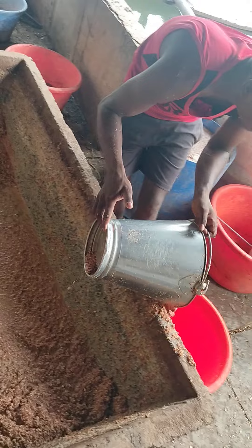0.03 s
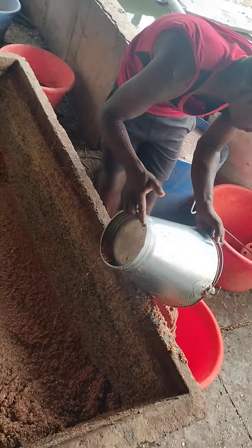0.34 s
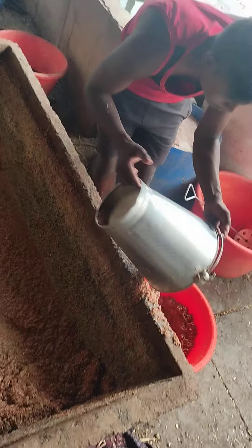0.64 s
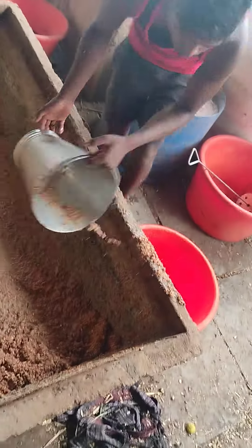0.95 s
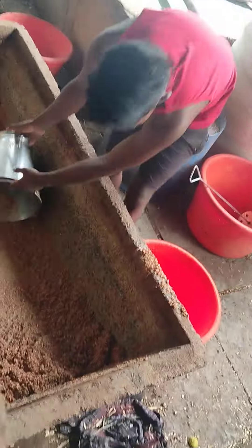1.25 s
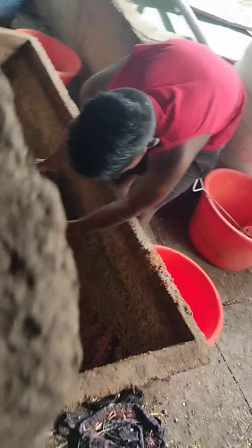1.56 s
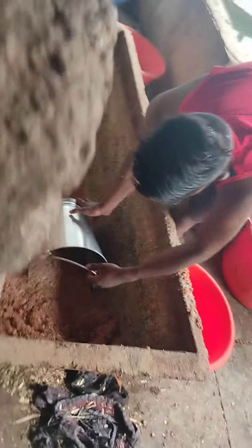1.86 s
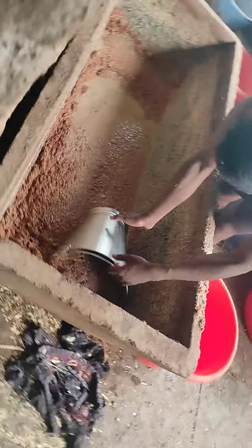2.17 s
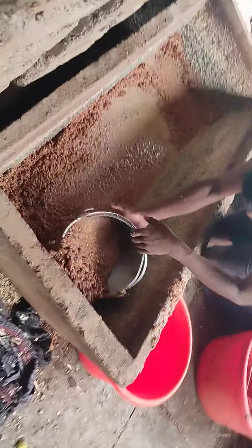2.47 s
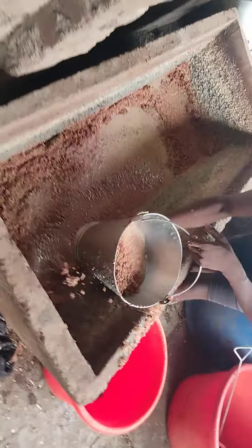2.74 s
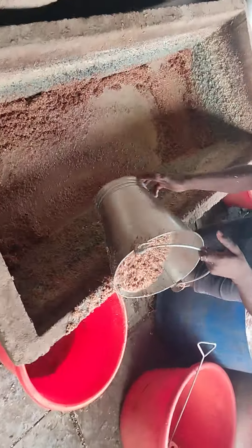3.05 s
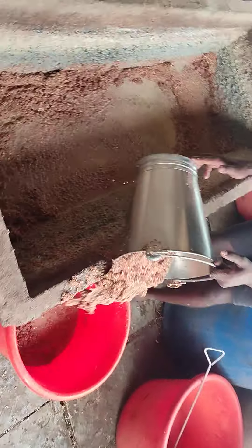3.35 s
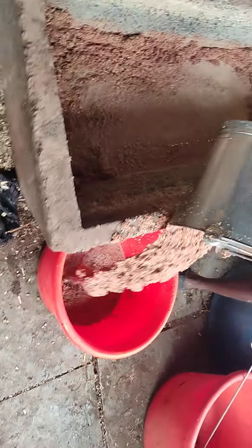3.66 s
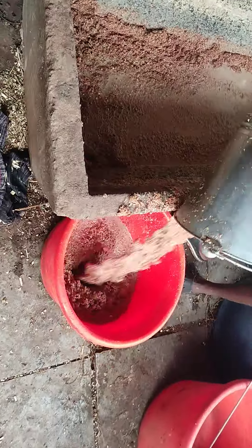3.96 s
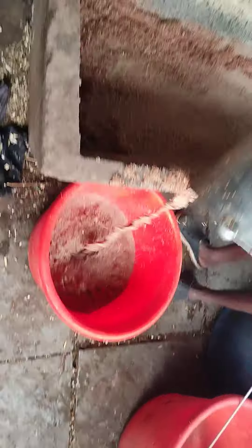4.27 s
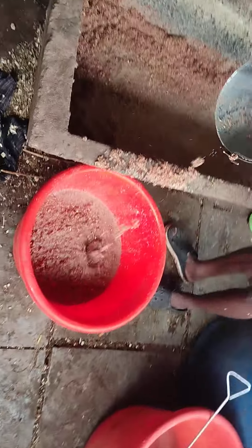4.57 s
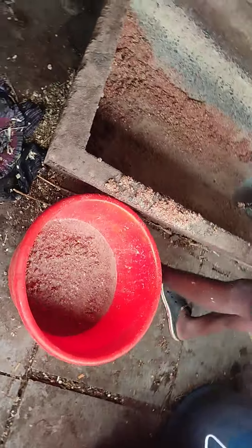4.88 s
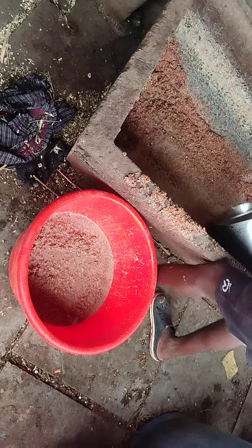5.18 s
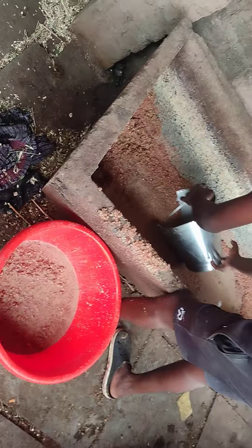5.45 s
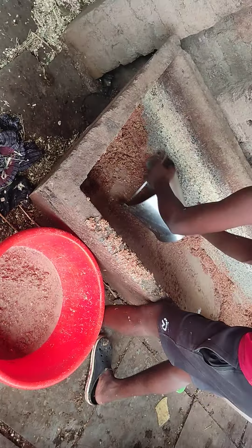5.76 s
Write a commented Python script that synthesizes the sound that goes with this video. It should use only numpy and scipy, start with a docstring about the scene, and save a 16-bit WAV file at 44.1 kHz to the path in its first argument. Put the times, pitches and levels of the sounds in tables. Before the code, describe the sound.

Damp, grainy feed pours twice from a metal bucket into a plastic tub, with the bucket scraping and knocking through a concrete trough after each pour.

```python
"""Damp, grainy feed pours twice from a metal bucket into a plastic tub: crumbs patter, wet lumps slap down
and the tub booms. After each pour the bucket is dragged through a concrete trough: its rim grinds on grit,
its walls and hollow ring, and it knocks dully. In between, its handle clinks and feet shuffle.
All this is close by in a quiet yard, with puffs of wind on the two microphones."""
import sys
import numpy as np
from scipy import signal
from scipy.fft import rfft, irfft, next_fast_len
from scipy.io import wavfile
from scipy.ndimage import uniform_filter1d, map_coordinates

SR = 44100
rng = np.random.default_rng(int(sys.argv[2]) if len(sys.argv) > 2 else 0)


def digitize_waveform(pressure):
    """Quantize a signal to 16-bit integers and store it at the path in sys.argv[1].

    Rows of a 2-D input are taken as channels; values are limited to [-1, 1].
    """
    field = np.atleast_2d(pressure).T
    bounded = np.clip(field, -1, 1)
    quanta = np.round(bounded * 32767).astype(np.int16)
    wavfile.write(sys.argv[1], SR, quanta)


N = 256662
TIME_S = np.arange(N) / SR
SIDES = np.array([[.5], [-.5]])  # half goes to the left, the opposite half to the right


def amp(db):
    """Turn decibels into a gain."""
    return 10 ** (np.asarray(db) / 20)


def unit(x):
    """Scale a sound to an average (rms) level of 1."""
    return x / np.sqrt(np.mean(x ** 2) + 1e-20)


def along(points, hz):
    """Read between (pitch_hz, value) points, spacing the octaves evenly."""
    pitches, values = np.transpose(points)
    return np.interp(np.log(hz + 1), np.log(pitches + 1), values)


def curves(rows):
    """Join timed rows with straight lines: one curve for each column after the time."""
    times, *columns = np.transpose(rows)
    return [np.interp(TIME_S, times, column) for column in columns]


def wobble(rate):
    """A smooth random curve that heads for a new value rate times a second."""
    return map_coordinates(rng.standard_normal(int(N * rate / SR) + 4), [TIME_S * rate])


def swell(time_s, half_s):
    """A smooth rise and fall around one moment."""
    return np.exp(-((TIME_S - time_s) / half_s) ** 2)


def held(start_s, end_s, rise_s, fall_s):
    """Rise, hold until the end, then fade away."""
    return np.clip((TIME_S - start_s) / rise_s, 0, 1) * np.exp(-np.maximum(TIME_S - end_s, 0) / fall_s)


def burst(start_s, fade_s, rise_s):
    """The loudness of one hit: a quick rise, and a fall of 60 dB in fade_s."""
    out, start = np.zeros(N + SR), round(start_s * SR)
    t = np.arange(SR // 3) / SR
    out[start:start + len(t)] = (1 - np.exp(-t / rise_s)) * amp(-60 * t / fade_s)
    return out[:N]


def filtered(x, response):
    """Turn each pitch in a sound up or down by response(hz)."""
    size = next_fast_len(N + SR // 4, True)
    return irfft(rfft(x, size) * response(np.fft.rfftfreq(size, 1 / SR)), size)[..., :N]


def colour(x, tone):
    """Shape a sound's bass, middle and treble with a tone table."""
    return unit(filtered(x, lambda hz: amp(along(tone, hz))))


def ring(x, notes):
    """Let a sound shake an object that rings at its own steady notes."""
    def response(hz):
        return sum(amp(db) * 1j * hz * width / (pitch ** 2 - hz ** 2 + 1j * hz * width)
                   for pitch, width, db in notes)
    return unit(filtered(x, response))


def glide(x, hz, width_hz, evenness):
    """Ring at one note, which may slide; evenness from 0 to 1 smooths out its loudness."""
    turn = np.exp(2j * np.pi * np.cumsum(hz * np.ones(x.shape[-1])) / SR)
    band = x / turn  # move the note down to 0 Hz, smooth it, then move it back
    for width in (width_hz, 2 * width_hz):
        band = signal.lfilter([1], [1, -np.exp(-np.pi * width / SR)], band)
    return unit((band * turn).real / (np.abs(band) + 1e-9) ** evenness)


def grains(rate, spread_db=0):
    """Tiny random clicks, about rate a second on each side; spread_db makes their sizes uneven."""
    size = amp(spread_db * np.clip(rng.standard_normal((2, N)), -2, 2))
    hits = rng.random((2, N)) < rate / SR
    return unit(hits * size * np.sign(rng.standard_normal((2, N))))


def patchy(x, depth_db):
    """Each passing clod has its own tone: random patches of time and pitch get louder or softer."""
    spectrum = signal.stft(x, nperseg=512)[2]
    patches = uniform_filter1d(rng.standard_normal(spectrum.shape[1:]), size=5, axis=0)
    patches = unit(uniform_filter1d(patches, size=4, axis=1))
    return unit(signal.istft(spectrum * amp(depth_db * patches), nperseg=512)[1][:, :N])


def wall_echo(x, fade_s, echo_db):
    """The trough and nearby walls add a short, blurred echo."""
    t = np.arange(SR // 3) / SR
    tail = rng.standard_normal((2, len(t))) * amp(-60 * t / fade_s) * (t > .002)
    tail /= np.linalg.norm(tail[0])
    return x + amp(echo_db) * signal.fftconvolve(x, tail, axes=1)[:, :N]


# how alike left and right sound: pitch_hz, likeness_0_to_1
LIKENESS = [(60, .1), (130, 1), (250, 1), (500, 0.9), (1000, 0.52), (2000, 0.033), (5000, 0.026),
            (12000, .02)]
def two_microphones(x):
    """Long, low waves reach both microphones alike; short, high ones do not."""
    blend = lambda hz: np.arcsin(np.clip(along(LIKENESS, hz), 0, 1)) / 2
    return filtered(x, lambda hz: np.cos(blend(hz))) + filtered(x[::-1], lambda hz: np.sin(blend(hz)))


# tone of the quiet yard: pitch_hz, level_db
YARD_TONE = [(59, -41), (100, -4), (258, -3.5), (627, -6.5), (2520, -11.5), (9150, -23.5), (12000, -30),
             (15500, -25)]
def yard():
    """A faint, steady outdoor hush."""
    return amp(-49.5) * colour(rng.standard_normal((2, N)), YARD_TONE)


# strength of the wind: time_s, level_db
GUSTS = [(0.07, -47.5), (0.22, -25.5), (0.47, -18.5), (0.78, -34), (1.07, -23), (1.55, -22), (1.97, -26),
         (2.3, -20), (2.55, -34), (2.8, -25), (3.15, -37.5), (3.48, -29), (4.0, -44.5), (4.6, -35.5),
         (4.85, -40.5), (5.22, -38.5), (5.35, -23), (5.82, -45)]
# which side the wind hits harder: time_s, left_over_right_db
GUST_SIDE = [(1.0, 5), (2.8, -2.5), (5.5, -3)]
# tones of the wind's deep rumble and quicker flutter: pitch_hz, level_db
RUMBLE_TONE = [(8, 0), (22, 1.5), (45, -5.5), (70, -4.5), (110, -27.5), (250, -77.5)]
FLUTTER_TONE = [(40, -27), (80, 3.5), (140, -1), (200, -8), (300, -17), (700, -49)]
def wind():
    """Puffs of air buffet each microphone separately; stronger gusts have a bigger share of flutter."""
    strength_db, = curves(GUSTS)
    flutter_db = -8.5 + 0.4 * (strength_db - strength_db.mean())
    side_db = SIDES * curves(GUST_SIDE)[0]
    puffs = amp(3.5 * np.array([wobble(29.51), wobble(30)]))
    air = lambda tone: unit(puffs * colour(rng.standard_normal((2, N)), tone))
    return amp(strength_db + side_db) * (air(RUMBLE_TONE) + amp(flutter_db) * air(FLUTTER_TONE))


# scuffs of feet and shifting feed: time_s, half_length_s, scuff_db, hiss_db
SCUFFS = [(2.587, 0.02, -49, -71), (2.792, 0.082, -51.5, -55), (3.018, 0.13, -50, -55),
          (3.253, 0.063, -48, -52.5), (3.42, 0.086, -44, -46), (4.7, 0.068, -43, -41),
          (4.84, 0.15, -47.5, -92), (4.973, 0.042, -47, -45.5), (5.222, 0.063, -44, -49.5)]
# tones of a scuff and of the finest bits of feed: pitch_hz, level_db
SCUFF_TONE = [(100, -15), (250, 3), (450, -1.5), (900, -3.5), (1500, -9.5), (2400, -3.5), (3600, -15),
              (7000, -37)]
SPRAY_TONE = [(1500, -54), (3000, -2), (4300, -1), (7000, -1), (9000, -3.5), (12000, -9.5), (15000, -5.5),
              (16500, -23)]
def shuffling():
    """Feet and loose feed rustle softly while the bucket is carried."""
    scuff = sum(amp(db) * swell(time_s, half_s) for time_s, half_s, db, _ in SCUFFS)
    hiss = sum(amp(db) * swell(time_s, half_s) for time_s, half_s, _, db in SCUFFS)
    feet = colour(grains(12000, spread_db=3), SCUFF_TONE)
    feed = colour(grains(12000, spread_db=4), SPRAY_TONE)
    return scuff * feet + hiss * feed


# bumps as the bucket is swung round: start_s, level_db
SOFT_BUMPS = [(1.125, -24), (1.231, -17), (1.286, -16), (1.393, -9), (1.456, -12), (2.601, -21)]
def handling_bumps(pitch_hz=150):
    """Handling the bucket makes soft, low bumps that die too fast to ring."""
    out = np.zeros(N)
    for start_s, db in SOFT_BUMPS:
        note = np.sin(2 * np.pi * pitch_hz * (TIME_S - start_s))
        out += amp(db) * burst(start_s, fade_s=0.04, rise_s=0.0016) * note
    return out


# clinks of the handle: start_s, level_db
HANDLE_HITS = [(0.7163, -28), (0.806, -22), (0.904, -24), (0.971, -18.5), (1.022, -31), (1.077, -24.5),
               (1.1582, -17.5), (1.239, -26)]
# notes the handle rings at: pitch_hz, width_hz, level_db
HANDLE_NOTES = [(1960, 55, 1), (2696, 78, 0), (2830, 59, 3), (3790, 100, -7), (4630, 120, -22)]
def handle_clinks():
    """The wire handle rattles briefly in its loops as the bucket is swung."""
    rattle = sum(amp(db - 8) * burst(start_s, fade_s=0.031, rise_s=.0005) for start_s, db in HANDLE_HITS)
    return rattle * ring(grains(9000), HANDLE_NOTES)


# sharp ticks of grit: start_s, level_db
GRIT_HITS = [(2.372, -34), (2.4728, -37), (2.5564, -20), (4.6147, -27), (5.3138, -26), (5.464, -14),
             (5.7957, -17)]
# tone of a tick: pitch_hz, level_db
TICK_TONE = [(500, 10), (1500, -4.5), (3000, -5.5), (5000, -1), (8000, 1.5), (12000, -8), (16000, -7)]
def grit_ticks():
    """Bits of grit make small, hard hits that are over in an instant."""
    hits = sum(amp(db - 4) * burst(start_s, fade_s=0.02, rise_s=0.00044) for start_s, db in GRIT_HITS)
    return hits * colour(grains(6100, spread_db=12), TICK_TONE)


# dull blows on the packed trough: start_s, level_db, pitch_hz, crunch_over_note_db
BUCKET_BLOWS = [(1.468, -11, 195, -46), (1.555, -7, 195, -33), (1.592, -5, 433, -11),
                (1.927, -0.5, 690, -32), (2.054, -10.5, 740, -10), (2.1, -7, 306, -11),
                (2.12, -10.5, 295, -22), (2.161, -7, 305, -31), (2.215, -23, 290, -21),
                (2.249, -11, 195, -29), (2.3361, -2, 284, -6.5), (2.375, -3, 262, -21),
                (2.476, -5, 287, -17.5), (3.065, -28.5, 298, -1.5), (3.165, -31, 348, -3),
                (3.304, -30, 536, -7.5), (5.248, -17, 207, -6), (5.314, -7, 194, -15.5),
                (5.676, -9, 196, -28), (5.79, -8.5, 232, -13.5)]
def bucket_knocks(swings_to_fade=21.5):
    """The loaded bucket thumps: one quickly fading note and a short crunch of feed under it."""
    crunch_tone = [(150, 14), (400, 21.5), (700, -13), (1100, -5), (3000, -33), (9000, -57)]
    feed = two_microphones(colour(grains(3000, spread_db=4.5), crunch_tone))
    out = np.zeros((2, N))
    for start_s, db, hz, crunch_db in BUCKET_BLOWS:
        wave = np.sin(2 * np.pi * hz * (TIME_S - start_s))
        note = burst(start_s, fade_s=swings_to_fade / hz, rise_s=0.0025) * wave
        crunch = burst(start_s, fade_s=0.13, rise_s=0.00059) * feed
        out += amp(db) * (note + amp(crunch_db) * crunch)
    return out


# drags through the trough: start_s, end_s, base_db, hollow_db, wall_db, grit_db
DRAGS = [(1.443, 2.192, -28, -31.5, -0.5, -13.5), (5.257, 5.82, -23.5, -35, -0.5, -8.5)]
# how hard the rim presses down, one list for each drag: time_s, level_db
RIM_PRESSURE = [
    [(1.45, -37), (1.55, -36.5), (1.63, -42.5), (1.72, -26.5), (1.87, -27.5), (1.98, -33.5), (2.1, -33.5),
     (2.23, -36), (2.31, -51.5), (2.37, -43), (2.44, -45.5), (2.5, -41.5)],
    [(5.25, -33), (5.28, -26), (5.36, -24.5), (5.48, -25.5), (5.7, -28.5), (5.82, -25.5)],
]
# the rim sticks and groans: peak_s, level_db, rise_s, fall_s
RIM_GROANS = [(1.74, -24, 0.033, 0.15), (1.94, -15.5, 0.055, 0.073), (2.341, -21, 0.0043, 0.019),
              (5.44, -29.5, 0.03, 0.28), (5.78, -24, 0.056, 0.018)]
# the rim bites into a patch of grit: time_s, level_db, half_length_s
GRIT_PATCHES = [(1.532, -34, 0.027), (1.8, -40, 0.027), (2.085, -46, 0.085), (2.479, -43, 0.0091),
                (5.335, -26, 0.015)]
def drag_loudness(load_db_per_s=9):
    """Base and hollow sound while the bucket moves; its walls and the grit follow how hard it presses."""
    base, hollow, wall, grit = np.zeros((4, N))
    for (start_s, end_s, base_db, hollow_db, wall_db, grit_db), presses in zip(DRAGS, RIM_PRESSURE):
        moving = held(start_s, end_s, rise_s=0.026, fall_s=0.15)  # digs in, then lifts off
        touching = held(presses[0][0], presses[-1][0], rise_s=0.0033, fall_s=0.04)
        pressure = amp(curves(presses)[0]) * touching
        load_db = load_db_per_s * (np.clip(TIME_S, start_s, end_s) - start_s)  # louder as it fills
        base += amp(base_db) * moving
        hollow += amp(hollow_db + load_db) * moving
        wall += amp(wall_db) * pressure
        grit += amp(grit_db) * pressure
    grit += sum(amp(db) * swell(time_s, half_s) for time_s, db, half_s in GRIT_PATCHES)
    groan = sum(amp(db) * np.exp(-np.maximum((peak_s - TIME_S) / rise_s, (TIME_S - peak_s) / fall_s))
                for peak_s, db, rise_s, fall_s in RIM_GROANS)
    return base, hollow, groan, wall, grit


# notes that slide as feed fills the bucket: time_s, hollow_hz, groan_hz
FILLING_NOTES = [(1.46, 234, 656), (1.72, 260, 903), (1.895, 320, 849), (1.94, 327, 661), (2.04, 308, 575),
                 (2.45, 272, 607), (5.3, 273, 850), (5.45, 481, 901), (5.58, 400, 950), (5.82, 390, 935)]
# notes the bucket's walls and rim ring at: pitch_hz, width_hz, level_db
WALL_NOTES = [(972, 18, 7.5), (1217, 12, 4.5), (1339, 38, 4.5), (1594, 50, 2.5), (1749, 59, 4),
              (1878, 47, 1), (2155, 41, 0.5), (2190, 310, -6), (2690, 38, -6.5), (3560, 19, -4.5)]
RIM_NOTES = [(4570, 50, -9), (5650, 87, 12), (5920, 150, 6), (6230, 38, 12), (6800, 84, 11.5),
             (7170, 130, 9), (7460, 60, 16), (7830, 96, 13), (7600, 80, 6)]
# tones of the low, middle and high parts of the grinding: pitch_hz, level_db
TROUGH_TONE = [(130, -35), (190, -33), (250, 10), (330, 3), (500, -0.5), (700, 0.5), (1400, -63)]
GRIND_TONE = [(200, -33), (500, -3), (900, 11.5), (1400, 6.5), (2400, 1.5), (3200, -4), (4500, -16),
              (8000, -62)]
GRIT_TONE = [(1800, 1), (3300, -5), (5000, -4.5), (7900, -7), (9300, -11), (12000, -27), (16000, -22)]
def bucket_scraping():
    """Grit slipping under the rim shakes the bucket's base, its hollow, its walls and the rim itself."""
    base, hollow, groan, wall, grit = drag_loudness()
    hollow_hz, groan_hz = curves(FILLING_NOTES)
    judder = amp(1.6 * wobble(80))  # the rim catches and lets go
    slips = judder * grains(5000, spread_db=2)
    sand = patchy(colour(judder * grains(7000, spread_db=0.5), GRIT_TONE), depth_db=3)
    base_note = amp(-3) * glide(slips, hz=215.4, width_hz=38.3, evenness=0.42)
    hollow_note = amp(3) * glide(slips, hollow_hz, width_hz=60, evenness=0.3)
    groan_note = amp(-1.5) * glide(slips, groan_hz, width_hz=60.6, evenness=1)
    trough = amp(-2.5) * colour(grains(3000), TROUGH_TONE)
    grinding = amp(-2) * patchy(colour(judder * grains(3000, spread_db=0.5), GRIND_TONE), depth_db=-0.5)
    wall_ring = amp(-2.5) * ring(patchy(slips, depth_db=6), WALL_NOTES)
    rim_ring = amp(-5) * ring(sand, RIM_NOTES)
    return (base * base_note + hollow * (hollow_note + trough) + groan * groan_note
            + wall * (wall_ring + grinding) + grit * (rim_ring + amp(2) * sand))


# tips of the bucket: start_s, end_s, rise_s, patter_db, boom_db, first_tub_hz, last_tub_hz
BUCKET_TIPS = [(0.09, 0.972, 0.21, -38.5, -41.5, 302, 270), (3.537, 4.353, 0.11, -36, -35, 437, 279)]
def feed_stream():
    """Each pour swells, holds and trickles out; the tub's note sinks while the feed runs in."""
    boom, patter, notes = np.zeros(N), np.zeros(N), []
    for start_s, end_s, rise_s, patter_db, boom_db, first_hz, last_hz in BUCKET_TIPS:
        rush = held(start_s, end_s, rise_s, fall_s=0.013)
        last_crumbs = amp(-9) * held(start_s, end_s, rise_s, fall_s=0.43)
        flow = np.maximum(rush, last_crumbs)
        boom += amp(boom_db) * flow
        patter += amp(patter_db) * flow
        notes += [(start_s, first_hz), (end_s, last_hz)]
    unevenness = amp(0.76 * wobble(70))
    return boom, patter * unevenness, curves(notes)[0]


# wet lumps landing: start_s, level_db, thud_db, spray_db, pat_hz, pat_db
# (thud_db, spray_db and pat_db are added to level_db)
WET_LUMPS = [(0.075, -43, -10, -9, 2250, -4), (0.105, -29.5, -21, -13.5, 670, -9.5),
             (0.221, -20.5, -29, -14, 740, -16), (0.294, -27, -13, -18, 685, 2),
             (0.33, -12, -9, -14, 800, -17), (0.392, -19, -1, -9, 865, -8),
             (0.442, -10.5, -14, -14, 1470, -17.5), (0.473, -11, -7, -16, 820, -10.5),
             (0.508, -11.5, -22, -14.5, 1040, -12.5), (0.594, -20.5, -26, -8, 796, -1),
             (0.719, -23.5, -7, -22, 2630, -11), (0.765, -18.5, -8, -34, 804, -7.5),
             (0.806, -10.5, -26, -24, 1990, -15), (0.853, -20.5, -10, -10, 640, -8),
             (0.883, -17, -3, -5.5, 810, -9.5), (0.92, -24, 6, 0, 2740, -10),
             (0.972, -22, -19, -6, 2750, -17), (1.177, -24.5, -4, -30, 697, -15),
             (3.541, -24.5, -8, -4.5, 1140, -19), (3.568, -11.5, -33, -15, 1790, -13.5),
             (3.618, -13, -24, -16, 945, -13.5), (3.698, -12.5, -11, -13.5, 1730, -15),
             (3.749, -14, -6, -19, 1600, -10.5), (3.771, -8, 1.5, -15.5, 686, -29),
             (3.813, -9.5, 2, -12.5, 1440, -24), (3.879, -10, -9, -14, 1120, -19),
             (3.916, -10.5, -6, -20, 680, -8.5), (3.972, -24, 7, -20, 1590, -6),
             (4.039, -15, -8, -15, 1870, -12.5), (4.058, -18, -7, -19, 1540, -16),
             (4.115, -16.5, -15, -11.5, 1820, -7.5), (4.141, -13.5, 0, -22, 1020, -10.5),
             (4.2, -14, 0.5, -17, 1660, -9.5), (4.233, -18.5, -20, -9, 1930, -10),
             (4.298, -21, -8, -3, 1990, -3), (4.329, -18.5, -19, -11, 2010, -16),
             (4.357, -18, 2, -5.5, 1070, -16), (4.408, -12, -6, -17, 1050, -14.5),
             (4.437, -16, -11, -12.5, 1740, -10.5), (4.517, -26, -18, -6.5, 2780, -8),
             (4.673, -18.5, -5.5, -4.5, 2400, -8.5)]
# tone of the falling crumbs: pitch_hz, level_db
CRUMB_TONE = [(150, -37), (400, -2), (600, -4), (900, -2), (1300, -3.5), (1800, -3.5), (2600, -2),
              (3700, -8), (5500, -18), (9000, -54)]
def feed_pouring(lump_fade_s=0.12):
    """A stream of crumbs and heavier wet lumps patter into the tub and drum on it."""
    boom, patter, tub_hz = feed_stream()
    boom_power, patter_power, spray_power = boom ** 2, patter ** 2, (amp(-1) * patter) ** 2
    pats, squish = np.zeros((2, N)), grains(5000, spread_db=3.5)
    for start_s, db, thud_db, spray_db, pat_hz, pat_db in WET_LUMPS:
        start = round(start_s * SR)
        near = slice(start, start + SR // 5)
        # a lump slaps, thuds and breaks into a short shower, adding its power to the stream's
        slap = burst(start_s, fade_s=0.018, rise_s=0.0003)[near]
        thud = burst(start_s, fade_s=0.077, rise_s=0.0097)[near]
        shower = burst(start_s, lump_fade_s, rise_s=0.0013)[near]
        boom_power[near] += (amp(db + thud_db) * thud) ** 2
        patter_power[near] += amp(db - 14) ** 2 * (slap ** 2 + shower ** 2)
        spray_power[near] += (amp(db + spray_db - 2.5) * shower) ** 2
        # air squeezed out from under the lump gives each pat its own pitch
        pat = glide(squish[:, near], pat_hz, width_hz=0.24 * pat_hz, evenness=0.42)
        pats[:, near] += amp(db + pat_db) * burst(start_s, lump_fade_s, rise_s=0.0023)[near] * pat
    tub = glide(grains(3000), tub_hz, width_hz=130, evenness=0.56)
    crumbs = patchy(colour(grains(2200, spread_db=3), CRUMB_TONE), depth_db=4)
    spray = patchy(colour(grains(4000, spread_db=5), SPRAY_TONE), depth_db=2.5)
    return np.sqrt(boom_power) * tub + np.sqrt(patter_power) * crumbs + np.sqrt(spray_power) * spray + pats


def scene():
    """The work at the tub and trough, over the quiet yard and the wind."""
    work = feed_pouring() + bucket_scraping() + grit_ticks() + handle_clinks() + shuffling()
    work = wall_echo(work, fade_s=0.24, echo_db=-7.5)
    return two_microphones(work + yard()) + bucket_knocks() + handling_bumps() + wind()


# which microphone hears each pitch louder: pitch_hz, left_over_right_db
MIC_BALANCE = [(60, 4.5), (200, 1.5), (400, -0.5), (800, 0.5), (1300, -1.5), (2400, -4.5), (4400, -4),
               (8000, 0), (15000, 0)]
def record(dry):
    """After a short silence both microphones hear, each with its own tone, the left a little earlier."""
    silent_s, left_lead_s, highest_hz = 0.069, 0.00008, 16000
    def response(hz):
        balance = amp(SIDES * along(MIC_BALANCE, hz))
        time_shift = np.exp(2j * np.pi * hz * left_lead_s * SIDES)
        return balance * time_shift * (hz < highest_hz)
    return filtered(dry * (TIME_S > silent_s), response)


dry = scene()
out = record(dry)
digitize_waveform(out)
```